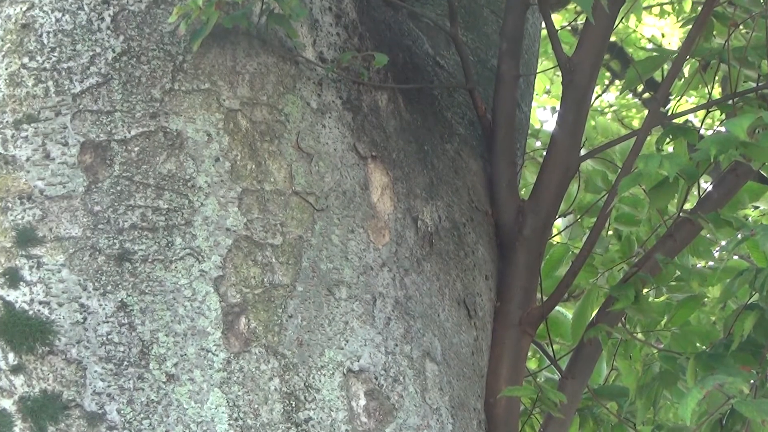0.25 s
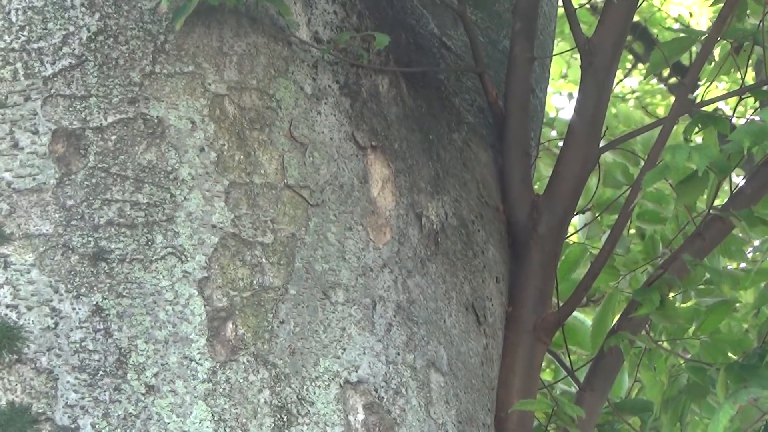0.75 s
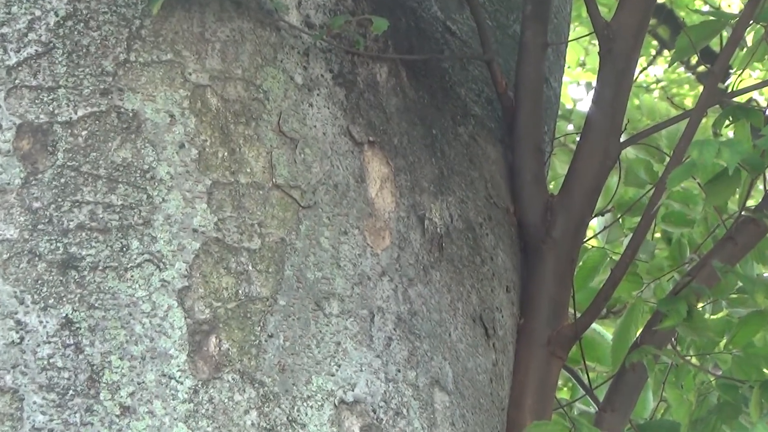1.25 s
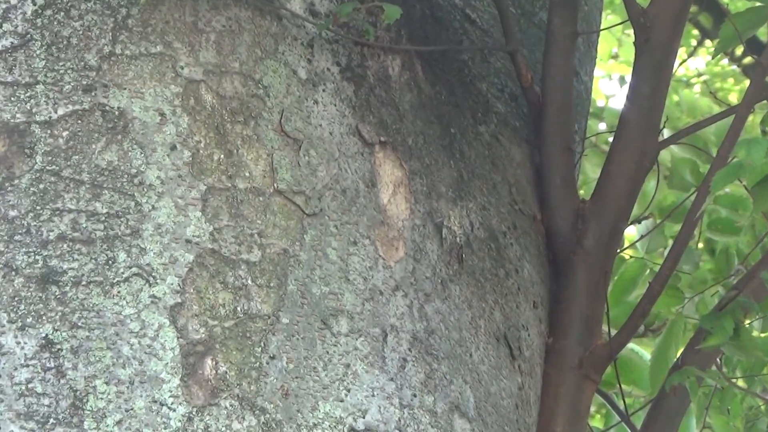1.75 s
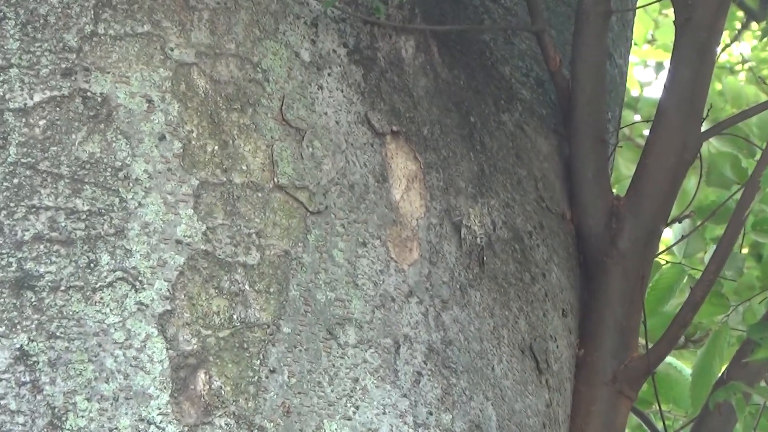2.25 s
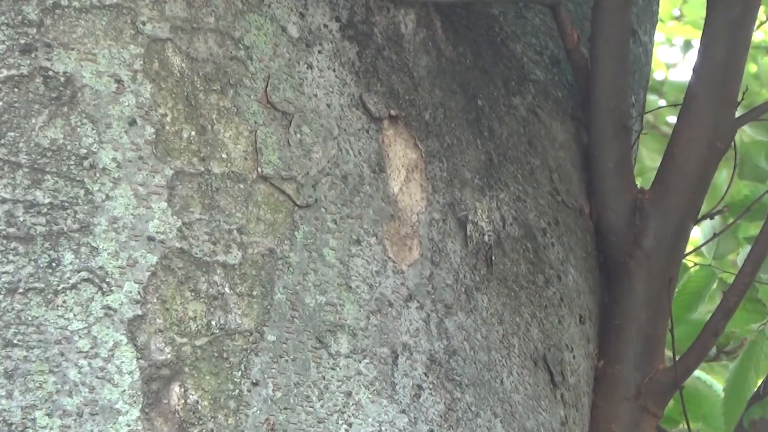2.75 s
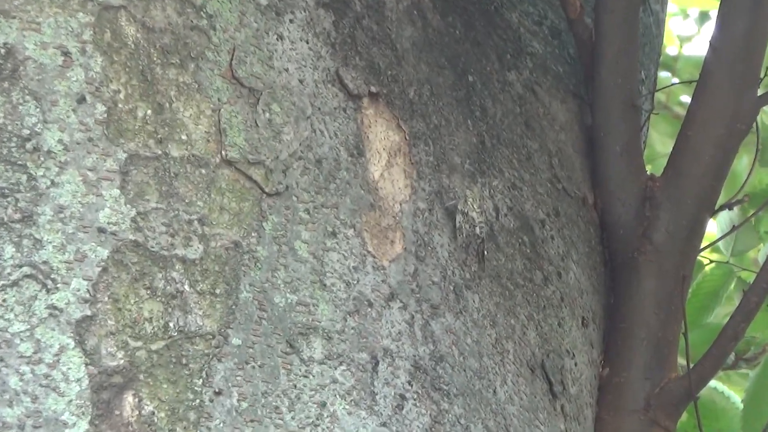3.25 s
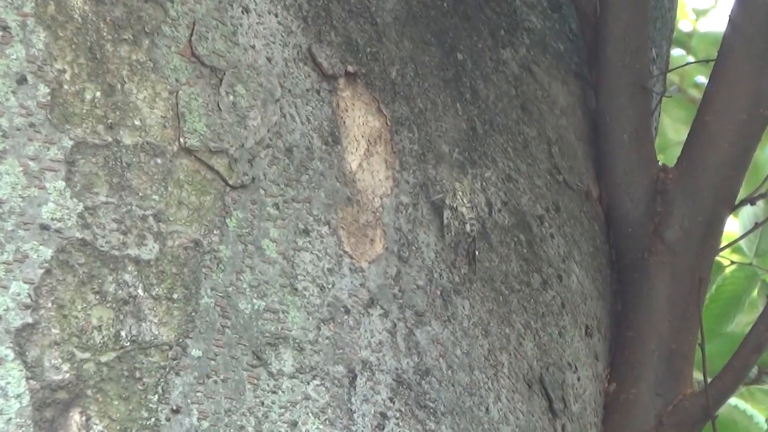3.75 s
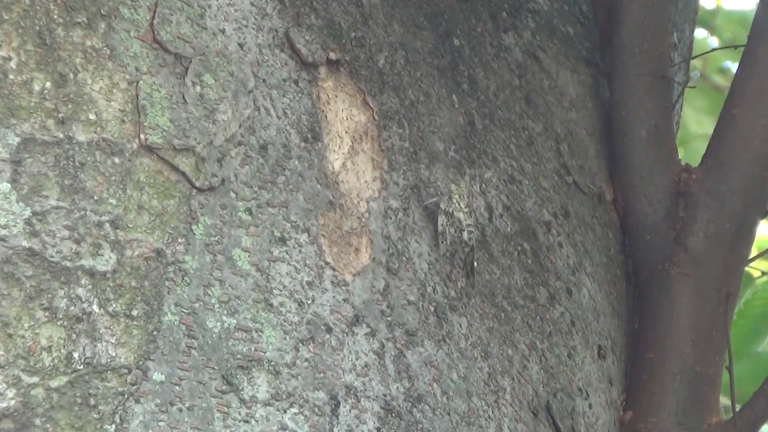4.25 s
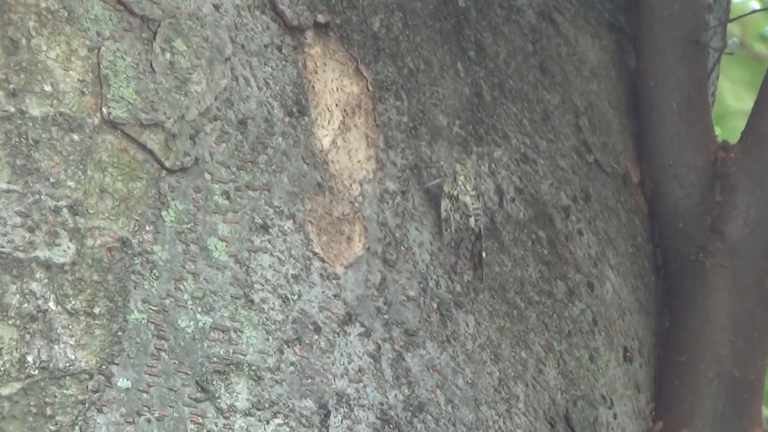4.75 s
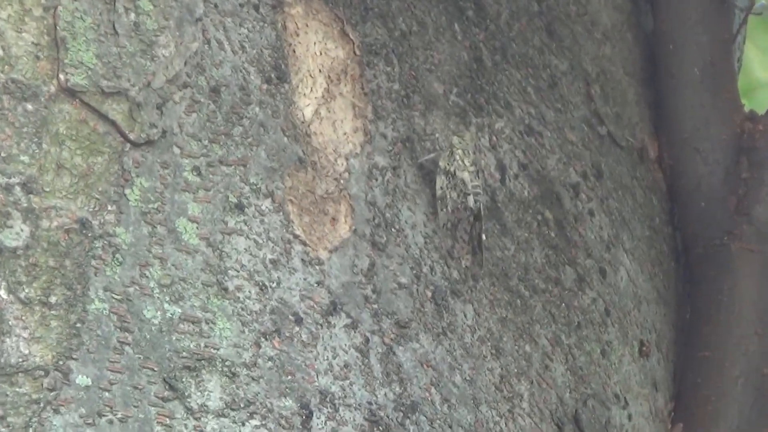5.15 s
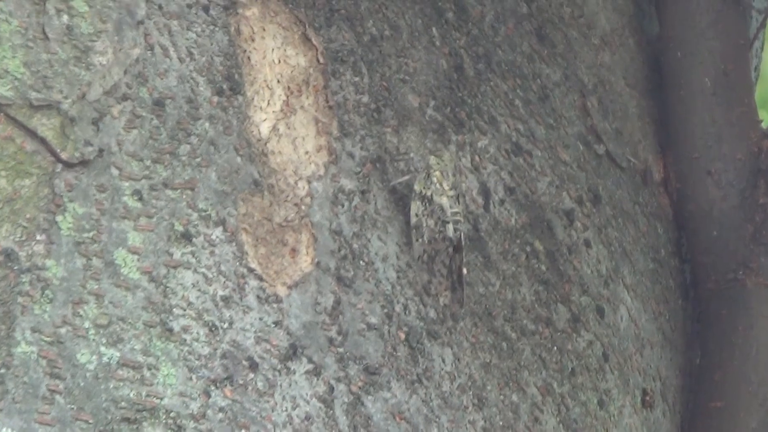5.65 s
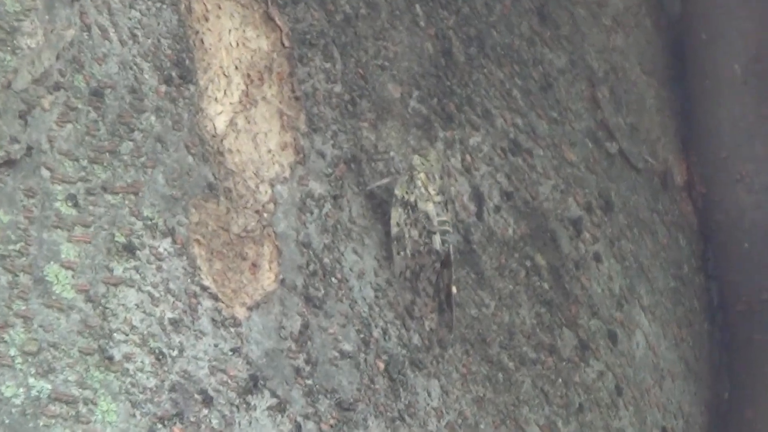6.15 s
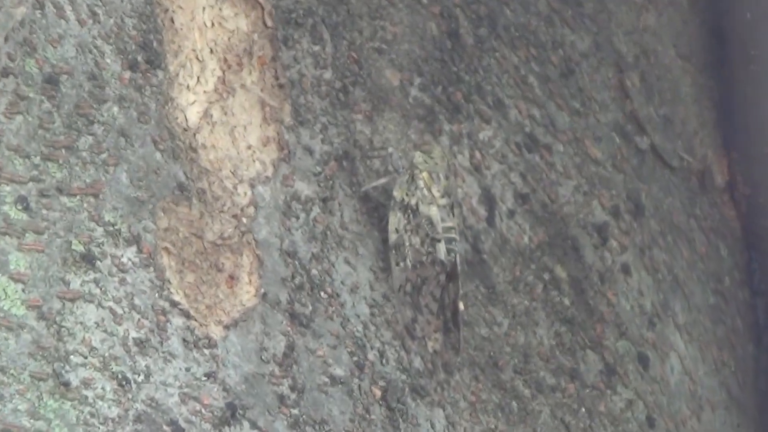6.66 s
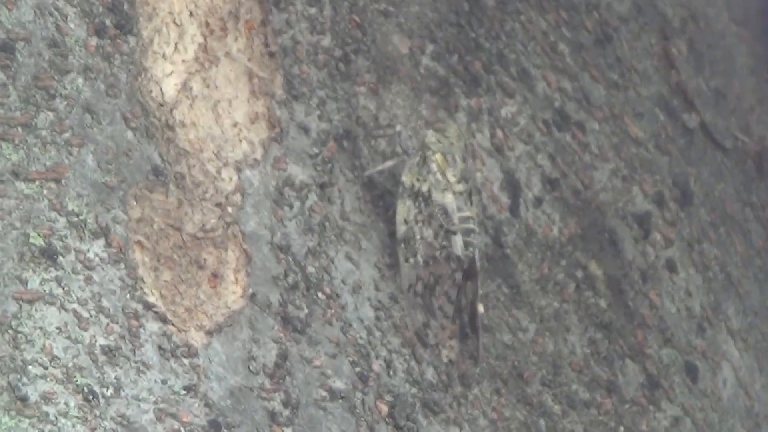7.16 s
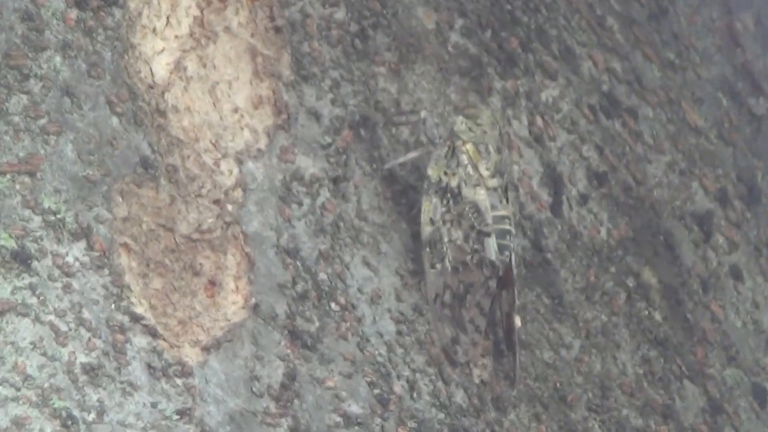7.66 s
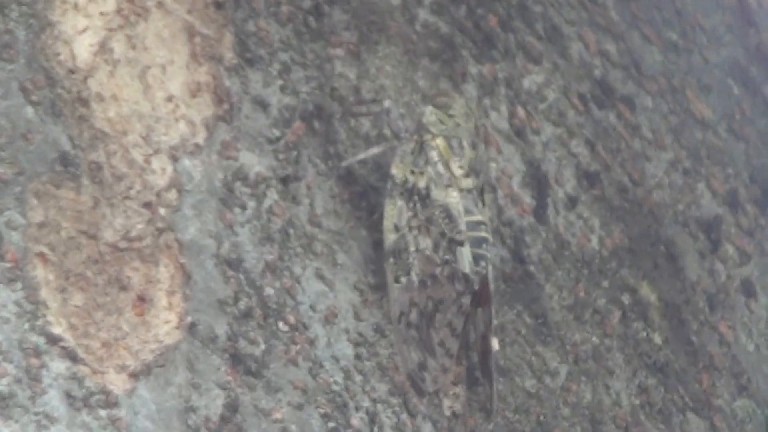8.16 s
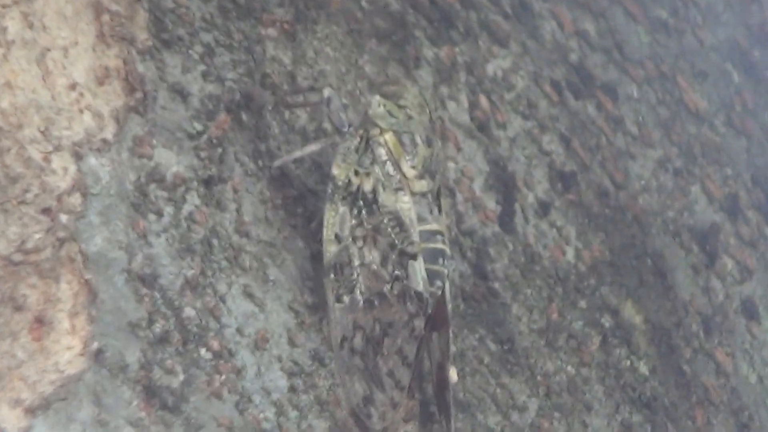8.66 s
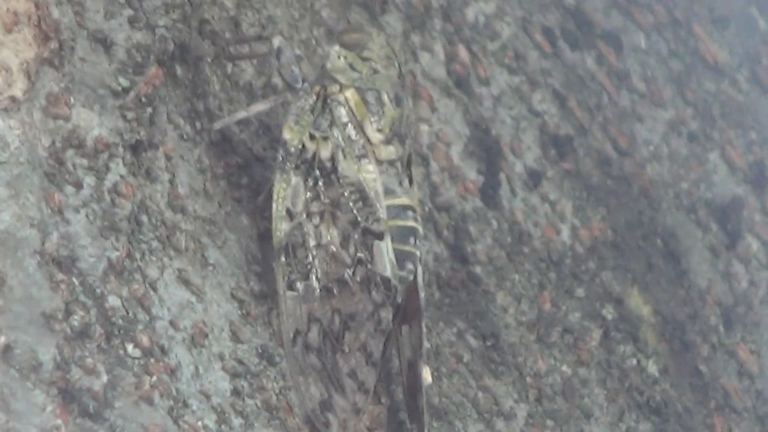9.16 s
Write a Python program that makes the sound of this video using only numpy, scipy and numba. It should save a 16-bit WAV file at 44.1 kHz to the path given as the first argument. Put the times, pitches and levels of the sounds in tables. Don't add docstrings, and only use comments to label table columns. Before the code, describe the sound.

A harsh, bright cicada buzz dominates from start to finish, centred and near, with short echoes off bark and leaves. The rapid clicks quicken as the tone sinks, then halfway the click rate drops and the tone leaps brighter. Low engine throb and road roar pass behind, strongest around five seconds, leaning left, then fade. Faint crisp insect ticks and a thin blur of far cicadas sit beneath.

```python
import sys
import numpy as np
from scipy import signal
from scipy.fft import rfft, irfft, next_fast_len
from scipy.io import wavfile
from scipy.ndimage import uniform_filter1d
from numba import njit

SR = 44100
rng = np.random.default_rng(int(sys.argv[2]) if len(sys.argv) > 2 else 0)


def unload_wav(signal):
    wavfile.write(
        sys.argv[1],
        SR,
        np.round(np.clip(np.atleast_2d(signal).T, -1, 1) * 32767).astype(np.int16),
    )


def to_linear_factor(level_db):
    exponent = np.asarray(level_db, float) / 20
    return 10 ** exponent


N = 415422
T = np.arange(N) / SR

# (time [s], rate [Hz])
CLICK_RATE = [(0, 508.3), (.6, 517.7), (1.75, 539.6), (2.4, 554.3), (3.0, 564.2), (3.6, 571), (4.2, 574),
              (4.62, 574), (4.625, 499.5), (5.0, 499), (5.45, 496.5), (5.85, 495.1), (6.65, 497.2),
              (7.2, 496.1), (8.3, 496.2), (9.1, 497.6), (9.42, 497.5)]
# (time [s], sways per click, long-short limp, random slip [us], slow lean [us])
SWAY = [(0, .14, .3, 8, 2), (1.4, .125, .2, 6, 2), (2.2, .135, .3, 7, 3), (2.8, .105, .9, 8, 3),
        (4.55, .103, 1.0, 8, 3), (4.72, .16, 0, 3, 1), (5.58, .158, 0, 2, .5), (5.62, .156, .5, 4, 1),
        (6.2, .14, .5, 7, 3), (6.26, .22, 0, 4, 1), (6.5, .225, 0, 6, 4), (7, .21, .05, 6.5, 5.5),
        (9.42, .198, .05, 6.5, 5.5)]
# (time [s], level [dB], body resonance [Hz])
SONG = [(0, -14.5, 7686), (2.05, -12.5, 7090), (2.6, -12.5, 6982), (3.44, -12.5, 6760), (4.61, -12.5, 6780),
        (4.67, -13.5, 7560), (4.78, -14.5, 8040), (4.96, -14, 8050), (5.1, -14.5, 8030), (6.5, -13.5, 8085),
        (6.9, -14, 7982), (9.42, -14, 7860)]
# (multiple of the resonance, width [Hz], level [dB])
BODY_RINGS = [
    (1.0, 2270, 3.5),
    (1.17, 2050, -6.5),
    (.86, 610, -11),
    (1.3, 1760, -17.5),
]
# (delay [ms], gain)
ECHOES = [(1.32, 0.13), (1.844, -0.1), (2.88, 0.1), (3.404, -0.12), (4.868, 0.08), (5.756, -0.08),
          (7.856, 0.29), (9.024, -0.1), (10.78, 0.08), (11.388, 0.08)]
# (time [s], firing rate [Hz], level [dB])
ENGINE = [(0, 31.5, -49.5), (1.1, 34.22, -48), (1.5, 29.9, -47.5), (1.8, 30.66, -47.5), (2.2, 35.93, -43.5),
          (2.9, 39.5, -44), (3.3, 37.77, -45.5), (3.75, 44.05, -45), (4.05, 45.3, -43), (4.4, 43.94, -40.5),
          (4.75, 43.1, -46.5), (5.5, 41.45, -44.5), (6.2, 40.55, -45.5), (6.55, 40.44, -42),
          (7.0, 39.8, -45.5), (8.6, 40.63, -46), (9.42, 38.87, -46.5)]
# (multiple of the firing rate, level [dB])
ENGINE_ORDERS = [(1, -12), (2, 1.5), (3, 0.5), (4, -0.5), (5, -6.5), (6, -2.5), (7, -14), (8, -18), (9, -8),
                 (10, -11.5), (11, -15), (12, -7), (13, -12), (18, -5)]
# (time [s], frequency [Hz])
GEAR_WHINE = [(4.5, 1610), (5.3, 1770), (5.85, 1925), (6.6, 1985), (7.3, 2025), (8.6, 2040)]
# (start [s], end [s], level [dB])
GEAR_LOADS = [
    (4.52, 4.93, -42.5),
    (5.0, 5.42, -41.5),
    (5.5, 6.0, -50),
    (6.0, 7.5, -52.5),
    (7.5, 8.6, -60),
]
# (time [s], tyre level [dB], time to fall 3 dB [s])
VEHICLE_PASSES = [
    (4.0, -42, 0.55),
    (5.27, -33, 0.3255),
    (6.68, -38, .15),
    (7.7, -41, .5),
]
# (start [s], end [s], frequency [Hz], width [Hz], level
# over the tyres [dB])
PANELS = [(3.68, 4.6, 750, 28.71, -8), (4.8, 5.4, 923, 70, -13), (5.1, 6.5, 1250, 40, -14),
          (4.901, 5.899, 752, 25, -14), (4.9, 5.9, 1620, 200, -8), (7, 7.8, 1030, 45, -11)]
# (frequency [Hz], density [dB per Hz])
ROAR_SPECTRUM = [(15, -49), (25, -11), (81, 3), (186, -1.5), (367, -6), (481, -9.5), (738, -4.5),
                 (1360, -8), (1700, -8), (4290, -23), (5500, -23), (7150, -47), (12100, -120)]
# (frequency [Hz], side minus mid [dB])
ROAD_LEAN = [(60, -19), (110, -6.5), (200, -10), (380, -8), (700, -6.5), (1290, -10.5), (2380, -11),
             (4400, -4.5), (8120, -23), (15000, -42)]
# (time [s], peak level [dB])
TICKS = [(0.1311, -36), (0.7402, -38), (1.0286, -39), (1.2062, -41), (1.2885, -40), (1.4167, -40),
         (1.5364, -38), (1.7295, -39), (1.8218, -37), (1.8642, -41), (2.0138, -40), (2.5238, -39),
         (2.8379, -41), (2.8878, -37), (2.9896, -39), (3.0395, -34), (3.1462, -36), (3.1952, -35),
         (3.3493, -35), (3.4017, -37), (3.5733, -38), (4.587, -41)]

JUMP_S = 4.7
THROB_HZ = 28


def curves(table):
    s, *columns = np.transpose(table)
    return [np.interp(T, s, c) for c in columns]


def unit(x):
    return x / np.sqrt(np.mean(x ** 2))


def bump(t, s, width_s):
    return np.exp(-((t - s) / width_s) ** 2)


def gate(start_s, end_s, ramp_s):
    return np.clip(np.minimum(T - start_s, end_s - T) / ramp_s, 0, 1)


@njit
def svf(x, hz, width):
    out, b, l = np.empty((2, len(x))), 0., 0.
    for i in range(len(x)):
        g, k = np.tan(np.pi * hz[i] / SR), width[i] / hz[i]
        v = (b + g * (x[i] - l)) / (1 + g * (g + k))
        out[0, i], out[1, i] = k * v, l + g * v
        b, l = 2 * v - b, l + 2 * g * v
    return out


def band(x, hz, width_hz, count=1):
    for _ in range(count):
        x = svf(x, hz + 0 * T, width_hz + 0 * T)[0]
    return x


def highpass(x, hz):
    return signal.sosfilt(signal.butter(4, hz, "high", fs=SR, output="sos"), x)


def walk(rate_hz):
    hold = int(SR / rate_hz)
    steps = np.repeat(rng.standard_normal(N // hold + 1), hold)
    return 1.325 * uniform_filter1d(uniform_filter1d(steps, hold), hold)[:N]


def mean_click_times():
    muscle_lag_s, wander_hz = .085, .4
    aim_hz = curves(CLICK_RATE)[0] + wander_hz * walk(14)
    keep = np.exp(-1 / muscle_lag_s / SR)
    rate_hz = signal.lfilter([1 - keep], [1, -keep], aim_hz - aim_hz[0] + 1) + aim_hz[0] - 1
    cycle = np.cumsum(rate_hz) / SR
    return np.interp(np.arange(1, int(cycle[-1])), cycle, T)


def place_clicks(at, size):
    taps = np.floor(at)[:, None] + np.arange(-7, 9)
    offset = taps - at[:, None]
    pulses = size[:, None] * np.sinc(offset) * np.cos(offset * np.pi / 16) ** 2
    out = np.zeros(N + 16)
    np.add.at(out, taps.astype(int), pulses)
    return out[:N]


def drum_clicks():
    swing_base_us, fresh_us, lifted_us, tire_s = 49, 19, 10, 2.6
    at = mean_click_times()
    s, *columns = np.transpose(SWAY)
    ratio, limp, slip_us, lean_us = (np.interp(at, s, c) for c in columns)
    slip_us = slip_us + 10 * bump(at, 5.355, .02)
    fresh = fresh_us * np.exp(-at / tire_s)
    lifted = lifted_us * np.exp((JUMP_S - at) / tire_s)
    swing_us = swing_base_us + np.where(at < JUMP_S, fresh, lifted)
    chance = rng.standard_normal((3, len(at)))

    sway = np.cumsum(ratio + .0016 * slip_us * chance[0])
    sway = sway + limp * np.sin(np.pi * sway) / np.pi / 2
    stretch = 0
    for k in range(1, 7):
        stretch = stretch - np.sin(2 * np.pi * k * sway) / k * np.clip((.75 - k * ratio) / .2, 0, 1)
    stretch = stretch * 2 / np.pi

    pump = 2 * np.pi * THROB_HZ * at + np.cumsum(.06 * chance[0])
    late_us = np.cumsum(swing_us * stretch + lean_us * np.sin(pump))
    late_us = late_us - uniform_filter1d(late_us, size=60) + slip_us * chance[1]

    scatter_db = .6 + .07 * slip_us + .9 * np.exp(-at)
    sway_db = 1.0 * np.sin(2 * np.pi * sway) + 1.0 * np.cos(4 * np.pi * sway)
    size = to_linear_factor(0.53 * np.cos(pump) + scatter_db * chance[2] + sway_db)
    return place_clicks((at + 1e-6 * late_us) * SR, size)


def hollow_body(push, body_hz):
    rings = sum(to_linear_factor(db) * unit(band(push, k * body_hz, w, count=4)) for k, w, db in BODY_RINGS)
    sac = band(band(push, body_hz, 3900, count=4), 5600, 350, count=2)
    body = unit(rings) + to_linear_factor(-15.5) * unit(sac)
    return unit(signal.sosfilt(signal.cheby2(10, 35, 5400, "high", fs=SR, output="sos"), body))


def ribs_and_wings(push, body_hz, throb):
    lift_khz = body_hz / 1000 - 7
    flare_db = 4 * bump(T, 4.8, 0.082)
    ribs_db = -31 + 9.5 * lift_khz + flare_db
    wings_db = -35.5 - 4.5 * lift_khz + flare_db
    blur = unit(push) + .55 * rng.standard_normal(N)
    ribs = highpass(band(blur, 10440, 4000) - 0.58 * band(blur, 13000, 3500), 10000)
    wings = unit(band(blur, 14950, 1100))
    wings = wings - to_linear_factor(-2) * unit(band(blur, 13800, 1200))
    wings = highpass(wings - to_linear_factor(-4) * unit(band(blur, 15700, 600)), 12800)
    return to_linear_factor(ribs_db) * unit(to_linear_factor(2 * throb) * ribs) + to_linear_factor(wings_db) * unit(wings)


def abdomen_flap(push, throb):
    return to_linear_factor(-27) * bump(T, 2.95, .6) * throb ** 2 * unit(band(push, 9740, 220, count=2))


def cicada():
    song_db, body_hz = curves(SONG)
    push = drum_clicks()
    throb = np.cos(np.pi * np.cumsum(THROB_HZ + 1.5 * walk(3)) / SR) ** 2
    body = hollow_body(push, body_hz)
    return to_linear_factor(song_db) * (body + abdomen_flap(push, throb) + ribs_and_wings(push, body_hz, throb))


def tree_echoes():
    size = SR // 8
    turn = rfft(np.eye(1, size)[0]) * np.arange(size // 2 + 1) / size
    bark = sum(1.29 * g * np.exp(-2j * np.pi * turn * ms * SR / 1000) for ms, g in ECHOES)
    near = irfft(1 + bark, size)
    t = np.arange(size) / SR
    fade = np.exp(-np.log(1000) * t / 0.1) * (np.arange(size) > .001 * SR)
    mid, side = rng.standard_normal((2, size)) * fade / np.sqrt(np.sum(fade ** 2))
    return near + to_linear_factor(-9) * mid, to_linear_factor(-22.5) * side - .03 * near


def lorry_engine(firing_hz, engine_db, tyre_db):
    turn = 2 * np.pi * np.cumsum(firing_hz * (1 + 0.002 * walk(4))) / SR
    near_db = .03 * np.minimum(tyre_db + 43, 2)
    orders = sum(to_linear_factor(db + 2.2 * walk(5) + k * near_db) * np.sin(k * turn) for k, db in ENGINE_ORDERS)
    return to_linear_factor(engine_db - 1.0) * unit(orders)


def gear_whine():
    load = sum(to_linear_factor(db) * gate(a, b, 0.042) for a, b, db in GEAR_LOADS)
    level = load * to_linear_factor(2 * walk(25))
    whine_hz = curves(GEAR_WHINE)[0] * (1 + 0.0045 * walk(60))
    return level * np.sin(2 * np.pi * np.cumsum(whine_hz) / SR)


def panel_hum(tyre_db):
    hum = 0
    for start_s, end_s, hz, width_hz, db in PANELS:
        hum = hum + to_linear_factor(db) * gate(start_s, end_s, 0.18) * unit(band(rng.standard_normal(N), hz, width_hz))
    return to_linear_factor(tyre_db) * hum


def road_roar(engine_db, tyre_db):
    treble_db = -.5 * (tyre_db - tyre_db.mean())
    swell_db = np.clip(walk(22), -1.5, 1.8)
    hz_at, db_at = np.transpose(ROAR_SPECTRUM)
    mid, loose = 0, 0
    for hz in 30 * 2 ** np.arange(0, 7.6, .5):
        share = np.clip(np.log2(hz / 200) / 2.76, 0, 1)
        drive_db = (1 - share) * engine_db + share * tyre_db + (hz > 1500) * treble_db
        spectrum_db = np.interp(np.log(hz), np.log(hz_at), db_at)
        gain = to_linear_factor(spectrum_db + drive_db + 18 + 0.91 * share * swell_db + 1.0 * walk(7))
        mid = mid + gain * band(rng.standard_normal(N), hz, hz / 1.82, count=2)
        loose_db = -13.5 - 7.2 * abs(np.log2(hz / 220))
        loose = loose + gain * band(rng.standard_normal(N), hz, hz / 3.9) * to_linear_factor(loose_db)
    return mid, loose


def road():
    firing_hz, engine_db = curves(ENGINE)
    traffic_power = to_linear_factor(-60) ** 2
    tyre_power = sum(to_linear_factor(db) ** 2 / (1 + ((T - s) / w) ** 2) for s, db, w in VEHICLE_PASSES)
    tyre_db = 10 * np.log10(traffic_power + tyre_power)
    roar, loose = road_roar(engine_db, tyre_db)
    mid = lorry_engine(firing_hz, engine_db, tyre_db) + gear_whine() + panel_hum(tyre_db) + roar

    hz_at, db_at = np.transpose(ROAD_LEAN)
    bin_hz = np.arange(1, N // 2 + 2) * SR / N
    lean = to_linear_factor(np.interp(np.log(bin_hz), np.log(hz_at), db_at))
    left = irfft(rfft(mid) * lean, N) + loose
    bass, wide = (signal.sosfiltfilt(signal.butter(4, hz, fs=SR, output="sos"), left) for hz in (400, 3700))
    spread = np.interp(T, (4.4, 4.85), (0, 1))
    return mid, bass + spread * (wide - bass)


def bush_cricket():
    tick_hz, tick_s, trim_db = 13000, .003, -1
    envelope = sum(to_linear_factor(db + trim_db) * bump(T, s + tick_s, tick_s) for s, db in TICKS)
    return np.sin(2 * np.pi * tick_hz * T) * envelope


def far_cicadas():
    throb = 1 + .5 * np.sin(2 * np.pi * np.cumsum(480 + 10 * walk(3.3)) / SR)
    return to_linear_factor(-45 + 1.5 * walk(2)) * unit(band(throb * rng.standard_normal(N), 5950, 260, count=3))


def scene():
    song = cicada() + far_cicadas()
    mid, side = (signal.fftconvolve(song, path)[:N] for path in tree_echoes())
    road_mid, road_side = road()
    ticks = bush_cricket()
    mid = mid + road_mid + ticks
    side = side + road_side + 0.26 * ticks
    return np.array([mid + side, mid - side])


def band_limit(x):
    return signal.sosfilt(signal.butter(12, 15700, fs=SR, output="sos"), x)


def record(dry):
    reach = np.abs(signal.hilbert(dry.mean(0), next_fast_len(N))[:N]) / .95
    reach = uniform_filter1d(uniform_filter1d(reach, size=13), size=13)
    limited = dry * np.tanh(reach) / (reach + 1e-9)
    return band_limit(limited)


dry = scene()
out = record(dry)
unload_wav(out)
```